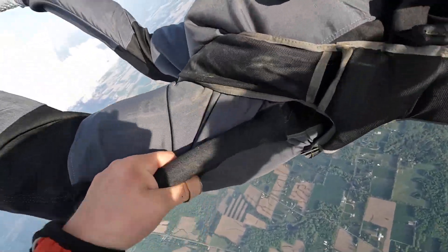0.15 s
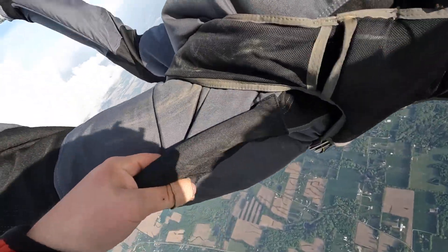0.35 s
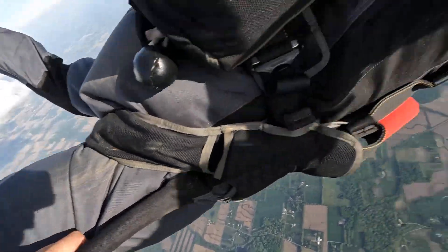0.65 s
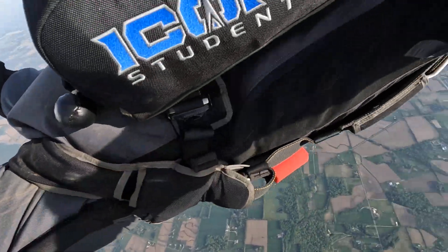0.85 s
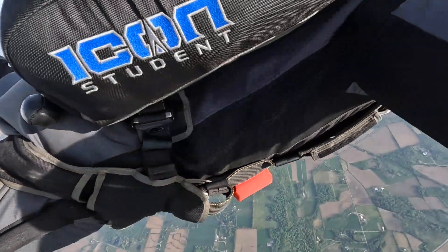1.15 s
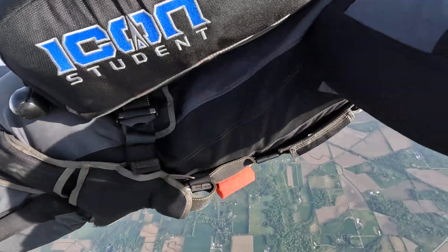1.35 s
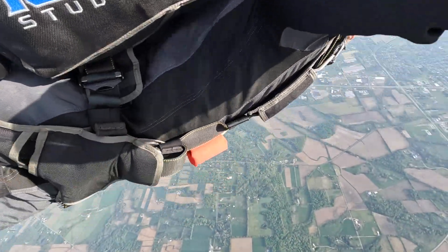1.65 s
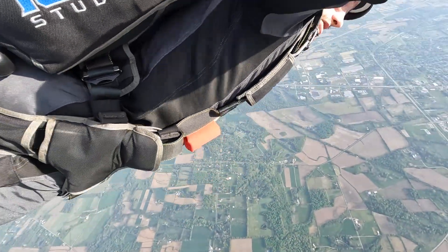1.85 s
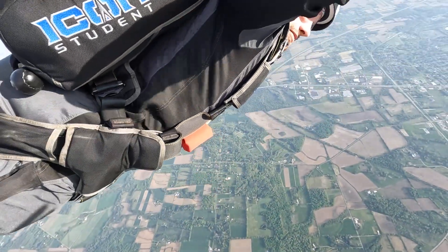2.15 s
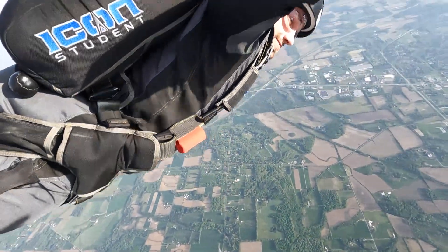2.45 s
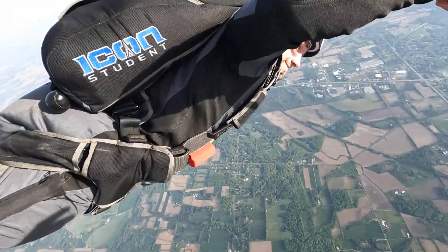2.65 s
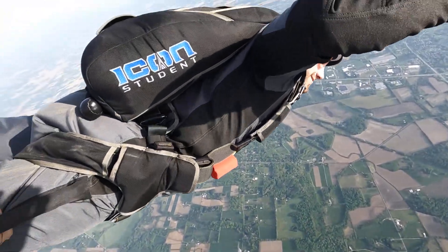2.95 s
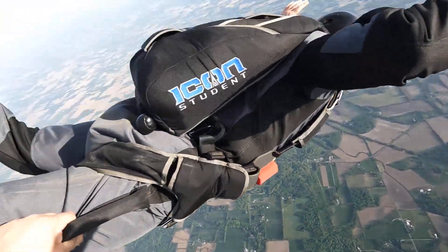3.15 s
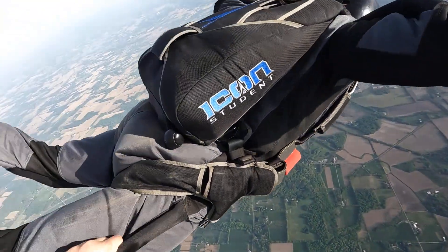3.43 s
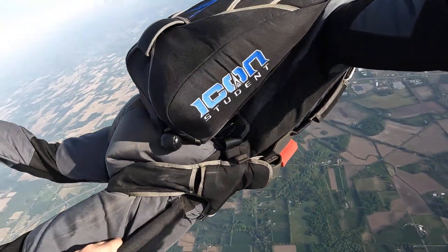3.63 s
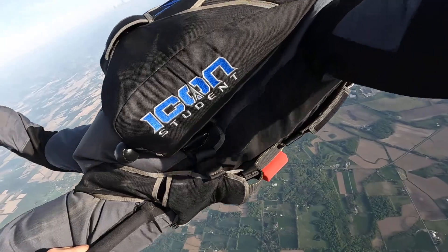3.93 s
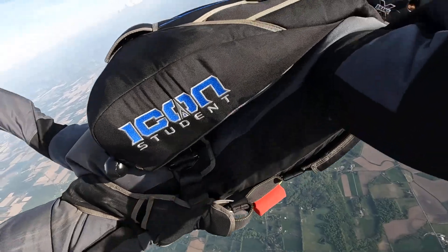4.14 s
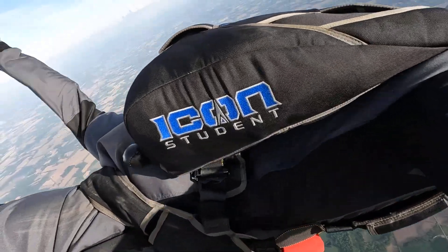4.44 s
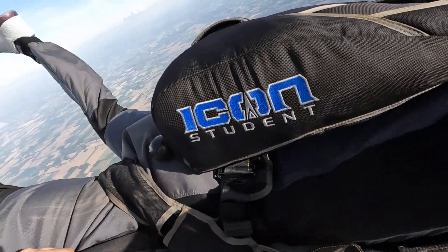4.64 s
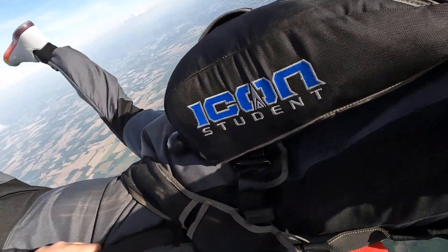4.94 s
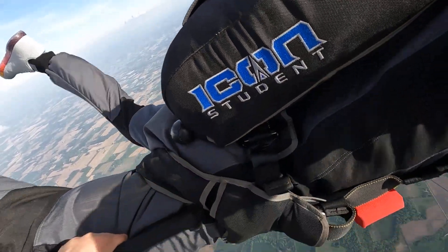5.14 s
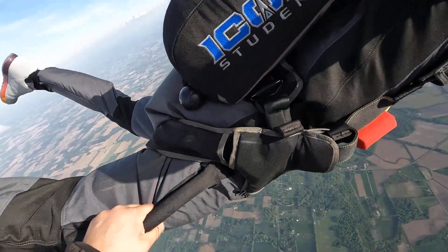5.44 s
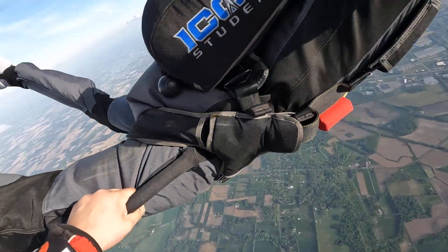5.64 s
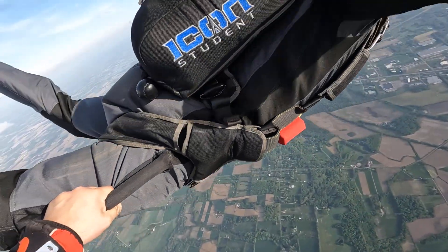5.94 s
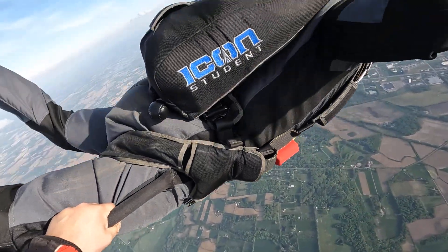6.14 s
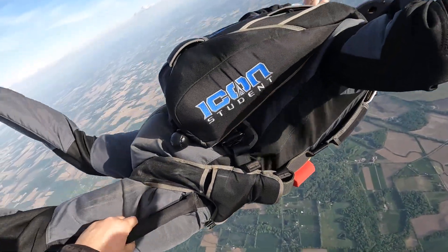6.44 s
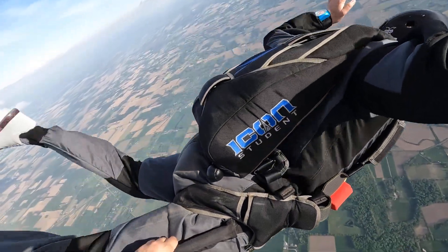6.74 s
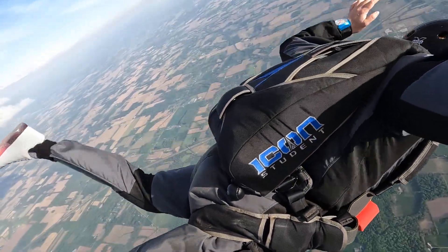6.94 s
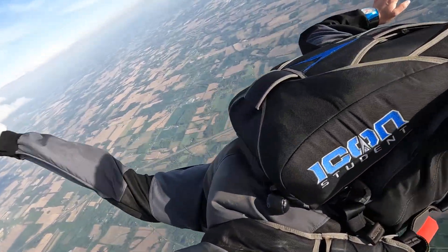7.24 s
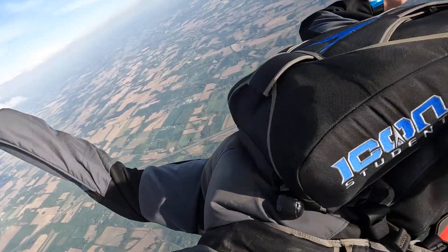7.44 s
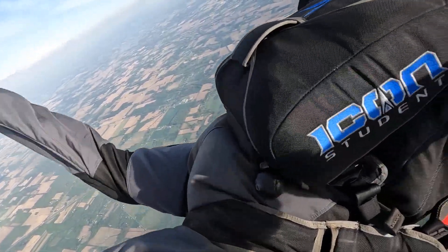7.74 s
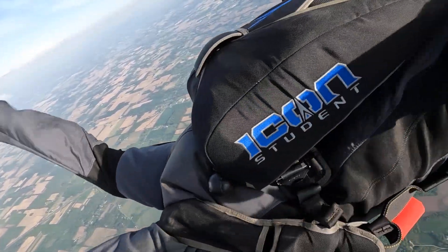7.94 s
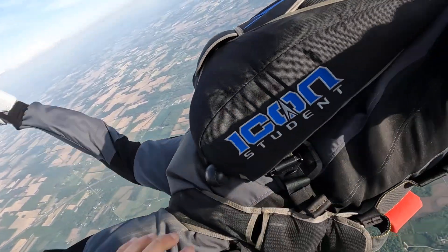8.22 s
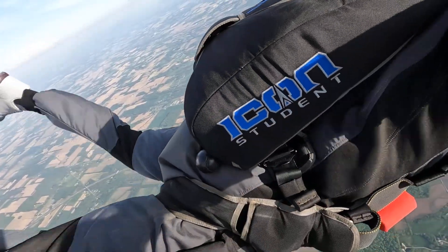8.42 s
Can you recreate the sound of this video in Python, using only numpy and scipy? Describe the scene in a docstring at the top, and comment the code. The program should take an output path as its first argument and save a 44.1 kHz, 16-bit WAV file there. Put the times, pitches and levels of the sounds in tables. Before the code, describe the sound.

A skydiver's rushing slipstream pounds a body-worn camera: deep uneven thumps, hollow whooshes, hissing turbulence, and a short rasp of flapping sleeve near the start.

```python
"""The slipstream of a freefall roars past a skydiver's camera, and its eddies buffet the microphone port.
Shaped noise makes the wind: humps that slide as the camera turns, deep heaves and hollow whooshes.
The rim of the port hisses and crackles, and hard slaps of air tear and thud. Early on a jumpsuit sleeve
flutters close by, made of rasp, edge cracks, rustle and beaten air. A limiter turns down around high peaks."""
import sys
import numpy as np
from scipy import signal
from scipy.fft import rfft, irfft, next_fast_len
from scipy.io import wavfile
from scipy.ndimage import uniform_filter1d, minimum_filter1d, map_coordinates

SR = 44100
rng = np.random.default_rng(int(sys.argv[2]) if len(sys.argv) > 2 else 0)


def log_audio(samples):
    """Write samples as a 16-bit WAV file to the path given in sys.argv[1]."""
    # one column per channel
    frames = np.atleast_2d(samples).T
    # limit to full scale, then quantise
    limited = np.clip(frames, -1, 1)
    pcm = np.round(limited * 32767).astype(np.int16)
    wavfile.write(sys.argv[1], SR, pcm)


N = 378378

# Shape of the smaller eddies' noise, also of the air the sleeve beats.
# Each row: octaves from the centre, relative level in dB per Hz.
EDDY_SHAPE = [(-3.5, -33), (-0.53, -5.5), (-0.22, 0), (.5, -5), (1.5, -11.5), (2.5, -20.5), (3.5, -33.5),
              (4.5, -51), (6, -93)]


def amp(db):
    """Decibels to gain."""
    return 10 ** (np.asarray(db) / 20)


def unit(x):
    """Scaled to rms 1."""
    return x / np.sqrt(np.mean(x ** 2) + 1e-20)


def curves(rows):
    """One value per sample for each column after the time."""
    s, *cols = np.transpose(rows)
    return [np.interp(np.arange(N) / SR, s, c) for c in cols]


def wobble(rate):
    """A smooth random curve, rate knots a second."""
    knots = rng.standard_normal(int(N * rate / SR) + 4)
    return map_coordinates(knots, [np.arange(N) * rate / SR])


def noise():
    """Fresh white noise."""
    return rng.standard_normal(N)


def filtered(x, response):
    """x times a response of frequency."""
    m = next_fast_len(N + SR // 2)
    return irfft(rfft(x, m) * response(np.fft.rfftfreq(m, 1 / SR)), m)[:N]


def coloured(x, spectrum):
    """x through (Hz, dB) points on a log axis, at rms 1."""
    f, db = np.transpose(spectrum)
    return unit(filtered(x, lambda hz: amp(np.interp(np.log(hz + 1), np.log(f), db))))


def steadied(x, span, share):
    """Evens out a share of the swells that last longer than span seconds, at rms 1."""
    window = signal.windows.hann(int(span * SR) + 3)
    power = np.abs(signal.fftconvolve(x ** 2, window / window.sum(), "same"))
    return unit(x / (power + 1e-4) ** (np.clip(share, 0, 1) / 2))


def bell(t, s, length):
    """A bell-shaped swell around s seconds; length is the width at half height."""
    return .5 ** ((2 * (t - s) / length) ** 2)


def swells(rows):
    """Bell-shaped swings in dB, one track for each level column."""
    t = np.arange(N) / SR
    tracks = np.zeros((3, N))
    for s, length, *depths in rows:
        near = slice(max(0, int((s - 2 * length) * SR)), int((s + 2 * length) * SR))
        tracks[:, near] += np.outer(depths, bell(t[near], s, length))
    return tracks


def shedding(rate):
    """An uneven sawtooth of rms 1: each vortex builds up, then breaks away at once."""
    turns = np.cumsum(rate * amp(5 * wobble(rate))) / SR
    size = rng.exponential(size=int(turns[-1]) + 1)[turns.astype(int)]
    ramp = uniform_filter1d(size * (turns % 1 - .5), size=60)  # softens the break
    return unit(ramp)


def wake(shape, centre_hz, hollow_db, patchy_db):
    """A hump of noise of rms 1, with a resonance on top, that slides with its centre and swells in patches."""
    hz, t, z = signal.stft(noise(), SR, nperseg=2048)

    def per_frame(curve):
        return np.interp(t, np.arange(N) / SR, curve * np.ones(N))

    octaves = np.log2((hz[:, None] + 1) / per_frame(centre_hz))
    resonance_db = per_frame(hollow_db) * np.exp(-(octaves / 0.62) ** 2)
    hump = amp(np.interp(octaves, *np.transpose(shape)) + resonance_db)
    # patches of the spectrum, 12 bins by 4 frames
    patches = uniform_filter1d(rng.standard_normal(z.shape), size=12, axis=0)
    patches = unit(uniform_filter1d(patches, size=4, axis=1))
    z = z * hump / np.linalg.norm(hump, axis=0) * amp(patchy_db * patches)
    return unit(signal.istft(z, SR, nperseg=2048)[1][:N])


def snaps():
    """The cloth's edge cracks like a small whip at an uneven rate; each crack starts at once and dies fast."""
    # Colour of the cracks. Each row: frequency in Hz, relative level in dB per Hz.
    crack_colour = [(800, -6), (2500, 6), (4800, 5), (6500, -5), (8500, -16), (10500, -27), (13000, -46),
                    (15000, -68)]
    rate, decay_s = 150, 0.0015  # median cracks a second, time constant
    turns = np.cumsum(rate * amp(4 * wobble(rate))) / SR
    cracks = np.diff(turns.astype(int), prepend=0) * amp(2.3 * noise())
    envelope = signal.lfilter([1], [1, -np.exp(-1 / (decay_s * SR))], cracks)
    return coloured(noise() * envelope, crack_colour)


def sleeve():
    """Taut cloth flaps, beats the air and tears in sharp bursts; a duller rustle bridges them."""
    # Bursts of flapping. Each row: start in seconds, length in seconds,
    # level in dB before the trim below, fall in dB per second.
    flutter_bursts = [(0.321, .003, -38, 1500), (0.338, 0.02, -31, 500), (.364, 0.022, -29.5, 600),
                      (0.399, 0.034, -31.5, 500), (0.438, .016, -32, 380), (0.518, 0.037, -32, 650),
                      (0.575, 0.036, -31.5, 950), (0.648, .018, -30, 1300), (0.682, .005, -36, 1400),
                      (.703, .005, -41, 1200)]
    # Sharp tearing of the cloth. Each row: frequency in Hz, relative level in dB per Hz.
    rasp_colour = [(400, -7), (1500, 1), (3000, 6.5), (4800, 0), (6500, -8.5), (8500, -21), (10500, -28),
                   (13000, -43), (15000, -69)]
    # Duller rustle under it. Each row: frequency in Hz, relative level in dB per Hz.
    rustle_colour = [(400, 5), (1500, 9), (2800, -1), (4000, -15), (6000, -34), (10000, -66)]
    rise_db_per_s, trim_db, linger_s = 2000, 4.0, 0.056
    snap_db, rustle_db, beat_db = -9.5, -3.5, -0.5  # over the burst envelope they follow

    t = np.arange(N) / SR
    levels = []
    for s, length, db, fall in flutter_bursts:
        before, after = np.maximum(s - t, 0), np.maximum(t - s - length, 0)
        levels.append(db - rise_db_per_s * before - fall * after)
    bursts = amp(np.max(levels, axis=0) + trim_db)
    lingering = uniform_filter1d(bursts, int(linger_s * SR))  # smeared over the gaps

    flaps = amp(2.2 * np.tanh(shedding(rate=140)) + 0.76 * wobble(900))
    rasp = unit(coloured(noise(), rasp_colour) * flaps)
    rustle = unit(coloured(noise(), rustle_colour) * flaps)
    beat = wake(EDDY_SHAPE, centre_hz=310, hollow_db=15, patchy_db=-1.0)
    sharp = rasp + amp(snap_db) * snaps()
    dull = amp(rustle_db) * rustle + amp(beat_db) * beat
    return bursts * sharp + lingering * dull


def whooshes(gust):
    """The stream blows across a gap in the gear: a band of air noise swells, fades and glides in pitch."""
    # Hollow whooshes. Each row: middle in seconds, length in seconds, pitch in Hz, level in dB.
    whoosh_rows = [(0.02, .08, 1170, -26), (1.263, 0.22, 1020, -27), (1.506, 0.18, 1200, -27),
                   (2.778, 0.12, 1190, -25), (3.503, 0.41, 1290, -27), (4.473, 0.069, 1840, -28),
                   (4.618, 0.14, 850, -27), (4.9, 0.1, 754, -28), (5.126, 0.097, 1050, -32),
                   (6.81, 0.17, 1880, -30.5), (7.128, 0.087, 1730, -26.5)]
    # Shape of a whoosh. Each row: octaves from its pitch, relative level in dB.
    gap_shape = [(-1.7, -39), (-0.62, -3.5), (-0.2, -0.5), (0.15, -6), (1.2, -23), (1.9, -67)]
    t = np.arange(N) / SR
    level = sum(amp(db) * bell(t, s, length) for s, length, hz, db in whoosh_rows)
    _, pitch_hz, _ = curves(whoosh_rows)
    return level * unit(wake(gap_shape, pitch_hz, hollow_db=2.5, patchy_db=1.0) * amp(0.71 * gust))


def heaves():
    """Each of the biggest eddies is a narrow rumble at its own pitch that swells and fades."""
    # Eddies rolling over the camera. Each row: middle in seconds, length in seconds,
    # pitch in Hz, level in dB.
    heave_rows = [(0.052, 0.15, 35.2, -17.5), (0.253, .1, 62, -19.5), (0.355, .17, 33, -21),
                  (.47, .14, 150, -21.5), (0.679, .2, 60, -18.5), (0.789, 0.17, 34, -19),
                  (0.873, 0.083, 62, -18.5), (1.012, .1, 62, -18.5), (1.441, .22, 33, -20),
                  (2.183, 0.36, 34, -21), (2.82, 0.19, 36, -24.5), (2.98, .08, 65, -20),
                  (3.283, 0.13, 75, -24), (3.396, .18, 33, -24), (3.551, .2, 67.6, -20),
                  (3.82, 0.18, 106, -23), (4.173, 0.11, 35, -22), (4.519, .25, 34, -19),
                  (4.732, 0.095, 65, -20), (5.196, .3, 32.3, -19), (5.62, 0.18, 134, -18.5),
                  (5.984, 0.099, 69.4, -19.5), (6.472, .14, 36, -19), (6.71, 0.25, 112, -20),
                  (7.11, 0.12, 36, -24), (7.46, .09, 125, -22), (8.002, 0.14, 120, -19.5),
                  (8.279, 0.17, 62, -19.5)]
    half_width = 0.34  # octaves
    t, out = np.arange(N) / SR, np.zeros(N)
    hz = np.fft.rfftfreq(2 * SR, 1 / SR)
    for s, length, pitch_hz, db in heave_rows:
        near = np.flatnonzero(np.abs(t - s) < min(2 * length, .5))
        band = np.exp(-(np.log2((hz + 1) / pitch_hz) / half_width) ** 2)
        rumble = unit(irfft(rfft(rng.standard_normal(2 * SR)) * band))
        rumble = steadied(rumble, span=3 / pitch_hz, share=1)
        out[near] += amp(db) * bell(t[near], s, length) * rumble[SR // 2:][:len(near)]
    return out


def hiss(hiss_db, pressure, gust, grit_db):
    """Fine turbulence at the port's rim, chopped by eddies; small vortices build up and break away."""
    # Colour of the hiss. Each row: frequency in Hz, relative level in dB per Hz.
    hiss_colour = [(500, 3), (1200, -2), (1900, 3), (2600, 0.5), (3200, 1), (4000, -9), (5200, -17.5),
                   (6500, -26), (8000, -41.5), (12000, -31), (13500, -64), (15000, -79)]
    carried_db = 0.67 * gust + 1.2 * pressure
    vortex_db = 0.65 * wobble(260) + 1.3 * np.tanh(shedding(rate=75))
    chop = amp(carried_db + vortex_db + grit_db)
    return amp(hiss_db + 4.0) * unit(coloured(noise(), hiss_colour) * chop)


def crackle(crackle_db, pressure, gust):
    """The flow tears at pressure crests: many tiny spits, thicker in gusts."""
    # Colour of the tiny spits. Each row: frequency in Hz, relative level in dB per Hz.
    spit_colour = [(200, 10), (800, 2.5), (2000, 8), (3500, 1.5), (5200, -6), (7500, -23), (10500, -27),
                   (12500, -43), (14500, -58)]
    crest = np.maximum(np.tanh(pressure + 0.31 * gust - .45), 0)
    tears = coloured(noise() * crest * amp(2.6 * wobble(350)), spit_colour)
    even = steadied(tears, span=.05, share=.8)
    return amp(crackle_db + 22.5 + 2.1 * wobble(22)) * even


def spits():
    """Single slaps of air: each tears in fast and snaps off over a dull push."""
    # Hardest slaps on the port. Each row: time in seconds, rip level and thud level in dB
    # before the trims below, decay time constant of the rip in seconds.
    slap_rows = [(.061, -38, -11.5, .002), (.092, -42, -15, .001), (.131, -39, -17, .0012),
                 (.177, -37, -21, .001), (.196, -31, -32, .0012), (.211, -37, -16, .002),
                 (.224, -30, -17, .0015), (.238, -35, -10.5, .001), (.270, -33, -15, .001),
                 (.276, -32, -11, .002), (.739, -31, -26, .0015), (.776, -29, -12, .002),
                 (.783, -32, -16, .0012), (.787, -34, -18, .0015), (.804, -38, -11, .0012),
                 (.820, -31, -12, .001), (.853, -40, -19, .0015), (.868, -36, -22, .0012),
                 (.883, -37, -15, .0015), (.925, -40, -15, .0015), (.945, -34, -26.5, .001),
                 (.951, -39, -21, .003), (.987, -30, -14, .0012), (1.008, -41, -13, .002),
                 (1.041, -29.5, -11, .0028), (1.1, -41, -14.5, .002), (1.115, -42, -22, .001),
                 (2.097, -32, -18, .001), (2.326, -38, -14.5, .001), (2.340, -35, -26, .0018),
                 (2.383, -34.5, -13.5, .004), (2.571, -37, -13, 0.0013), (2.68, -36, -14, .002),
                 (2.684, -35, -19, .0015), (2.921, -32, -17, .0015), (3.175, -31, -12, .0008),
                 (3.255, -35, -16, .002), (3.314, -29, -14, .0012), (3.320, -28, -18, .003),
                 (3.339, -39, -22, .0012), (3.539, -26, -19, 0.0018), (3.561, -37, -12.5, .001),
                 (3.674, -33, -22, .001), (3.683, -36, -13, .002), (3.8, -32, -18, .0015),
                 (3.953, -33, -24, .0015), (3.959, -38, -12, .0015), (4.325, -32, -15, .0015),
                 (4.774, -30, -14, 0.0024), (4.985, -34, -29, .0018), (4.998, -32, -19, .0012),
                 (5.358, -30, -13, .0015), (5.521, -32, -16, .0015), (5.535, -35, -22, .001),
                 (5.624, -34, -25, .0015), (5.641, -38, -16, .001), (5.694, -29, -10, .0015),
                 (5.712, -34, -18, .001), (5.802, -32, -13, .0015), (5.869, -45, -12, .002),
                 (5.929, -32, -25, .001), (6.467, -32, -15.5, .001), (6.489, -37, -13, .001),
                 (6.609, -30, -14.5, .0015), (6.695, -33, -14, .0015), (6.777, -29, -22, .001),
                 (6.908, -33, -25, .001), (7.028, -32, -14.5, .001), (7.328, -34, -24, .001),
                 (7.34, -31.5, -19.5, .001), (7.388, -38, -15, .001), (7.395, -28, -13.5, .0015),
                 (7.623, -27, -20, .0012), (7.791, -33, -19, .001), (7.836, -31, -17.5, .001),
                 (7.87, -32, -20, 0.00091), (7.915, -29, -21, .0015), (7.93, -30, -22, .001),
                 (7.989, -34, -19, .001), (8.018, -32, -19, .001), (8.031, -30, -29, .001),
                 (8.083, -28, -20, .001), (8.217, -32, -18, .001), (8.258, -30, -25, .001),
                 (8.278, -35, -18, .001), (8.314, -29, -27, .001), (8.325, -25.5, -17.5, 0.0018),
                 (8.483, -30, -14, .001)]
    # Sharp rip of a slap. Each row: frequency in Hz, relative level in dB per Hz.
    rip_colour = [(200, 8), (800, 7.5), (2000, 11), (3500, 3), (5200, -5.5), (7500, -21), (10500, -24),
                  (12500, -47), (14500, -63)]
    # Dull push of a slap. Each row: frequency in Hz, relative level in dB per Hz.
    thud_colour = [(80, -5.5), (200, 7.5), (400, -4), (900, -5.5), (2000, -21.5), (4000, -34), (8000, -64)]
    rip_rise_s, thud_rise_s, thud_decay_s = 0.00056, 0.0013, 0.0035  # time constants
    rip_trim_db, thud_trim_db = 6.0, 0.6
    t, tear, push = np.arange(N) / SR, np.zeros(N), np.zeros(N)
    for s, db, thud_db, decay in slap_rows:
        near = slice(int((s - .04) * SR), int((s + .06) * SR))
        age = t[near] - s
        tear[near] += amp(db) * np.exp(-np.maximum(-age / rip_rise_s, age / decay))
        push[near] += amp(thud_db) * np.exp(-np.maximum(-age / thud_rise_s, age / thud_decay_s))
    rip = steadied(coloured(noise(), rip_colour), span=.002, share=0.75)
    thud = steadied(coloured(noise(), thud_colour), span=0.0039, share=0.71)
    return amp(rip_trim_db) * tear * rip + amp(thud_trim_db) * push * thud


def buffeting(buffet_db, eddy_db, eddy_hz, gust):
    """Pressure on the port: an unbroken train of big eddies, and smaller ones that come in gusts."""
    # Colour of the big eddies. Each row: frequency in Hz, relative level in dB per Hz.
    buffet_colour = [(8, -2.5), (20, -2), (35, -5), (55, 1), (80, -2.5), (115, -4), (170, -15), (300, -25),
                     (700, -83)]
    big = steadied(coloured(noise(), buffet_colour), span=0.037, share=0.71)
    small = wake(EDDY_SHAPE, eddy_hz, hollow_db=1.0, patchy_db=0.5) * amp(1.47 * gust)
    small = steadied(small, span=0.22, share=0.5)
    big_gain = amp(buffet_db + 0.58 * wobble(16))
    small_gain = amp(eddy_db - 1.03 + 1.13 * wobble(14))
    return big_gain * big + small_gain * small


def slipstream(level_db, roar_hz, hollow_db, gust, grit_db):
    """The broad roar of air passing the bodies, shaken by the gusts."""
    # The roar's hump. Each row: octaves from its centre, relative level in dB.
    roar_shape = [(-2.5, -3.5), (-2, 3), (-0.25, 0.5), (.5, -4.5), (0.88, -11), (1.5, -24.5), (3, -70)]
    shake = amp(0.98 * gust + .6 * grit_db)
    roar = wake(roar_shape, roar_hz, hollow_db, patchy_db=0.83) * shake
    # the more hollow the roar, the quieter it is
    return amp(level_db - 0.2 - 0.57 * hollow_db) * steadied(roar, span=0.27, share=0.85)


def scene():
    """Shared swings, gusts and port pressure tie buffeting, roar, whooshes, hiss and crackle together;
    heaves, slaps and sleeve run on their own."""
    # Colour of the wakes as the camera turns. Each row: time in seconds, eddy centre in Hz,
    # roar centre in Hz, hollow resonance in dB.
    wake_colour = [(0, 196, 1175, 4), (.5, 248, 1260, 3.5), (.95, 236, 950, 10.5), (1.3, 221, 1130, 5),
                   (1.55, 240, 1180, 2), (1.95, 232, 640, -2.5), (2.3, 208, 925, 2), (2.8, 187, 964, 4.5),
                   (3.45, 130, 1220, 1), (3.85, 159, 1150, -0.5), (4.5, 230, 1370, 1), (4.8, 244, 1160, -2),
                   (5.2, 256, 1210, 0), (5.5, 190, 1156, -1.5), (5.85, 195, 1370, 6.5),
                   (6.7, 121, 1500, -3), (7.1, 168, 1640, -1), (7.7, 163, 1400, 0.5), (8.58, 180, 1510, 1)]
    # Slow pressure on the port as the camera moves through the wake.
    # Each row: time in seconds, base level of the big eddies in dB, of the smaller ones in dB.
    port_flow = [(0, -17.5, -23), (.5, -17.5, -18), (1.05, -17.5, -18.5), (1.2, -21, -21.5),
                 (1.95, -19, -22), (3.15, -20, -19.5), (3.3, -15.5, -20.5), (3.9, -19, -18),
                 (4.05, -18, -23), (4.5, -19.5, -23.5), (4.95, -17.5, -24), (5.1, -18, -25.5),
                 (5.42, -17.5, -21), (5.6, -16.5, -19.5), (6.45, -18, -18), (6.9, -17.5, -18.5),
                 (7.95, -17.5, -17.5), (8.58, -17, -19.5)]
    # Strength of the slipstream round the bodies. Each row: time in seconds, base level in dB.
    stream_strength = [(0.0, -21), (0.6, -23), (0.9, -31), (1.5, -25), (1.8, -23), (3.0, -20.5),
                       (3.15, -22), (3.45, -23.5), (4.05, -24), (4.95, -21.5), (6.45, -27.5), (8.25, -25.5),
                       (8.58, -25.5)]
    # Turbulence at the port's rim. Each row: time in seconds, base hiss in dB, base crackle in dB.
    rim_turbulence = [(0, -39.5, -78), (.75, -34.5, -69), (1.05, -42, -69), (1.2, -41.5, -88),
                      (2.5, -41, -72.5), (3.15, -38.5, -75), (3.55, -39.5, -63.5), (4.15, -36.5, -76),
                      (4.55, -42.5, -81), (5.4, -39.5, -77), (5.55, -37, -66.5), (6.3, -40.5, -70),
                      (6.6, -39, -64), (6.9, -39.5, -72), (7.45, -39.5, -67), (7.65, -39, -64),
                      (8.25, -42.5, -65.5), (8.58, -42, -72)]
    # Lulls, when the flow briefly lifts off the camera; single layers may rise.
    # Each row: middle in seconds, length in seconds, change of roar, eddies and buffets in dB.
    lulls = [(.08, 0.023, -4.5, 7, -0.5), (.252, 0.017, -4.5, -4.5, -2.5), (.3, 0.021, -7, 2, 4.5),
             (.755, 0.049, -12, -0.5, 0), (.83, 0.074, -12, -3.5, 2), (.902, 0.035, -10, -7, -9.5),
             (1.07, 0.02, -3, -2.5, -8), (1.15, 0.036, -4, -4, -9.5), (1.72, 0.065, 0, 1, -4),
             (1.8, 0.031, -4.5, -3.5, 3.5), (2.025, 0.043, -4.5, -4.5, 3.5), (2.13, 0.026, 2.5, -4.5, 0.5),
             (2.22, 0.032, 2.5, -9.5, -2.5), (2.42, 0.079, -3.5, -1, -1), (2.595, 0.028, -10, -5.5, -1),
             (2.7, 0.07, -1.5, -6, -1), (3.203, 0.037, -7.5, -3, -2), (3.275, 0.017, -5.5, -12, 0.5),
             (3.58, 0.024, -2.5, -10, -6.5), (3.75, 0.057, -0.5, -2, -10), (3.99, 0.067, -2.5, -4.5, 2),
             (4.23, 0.077, 1.5, -2, 0.5), (4.83, 0.047, 0.5, -5, -3.5), (5.03, 0.034, -5, 1, -12),
             (5.15, 0.084, 1, -5, -2.5), (5.42, 0.047, 0.5, -9.5, -10.5), (5.75, 0.034, -8, -2.5, -2.5),
             (5.85, .035, -4, -3, -3.5), (6.22, 0.034, 0.5, 0, 2), (6.345, 0.049, -5, -4, 2.5),
             (6.42, 0.078, 2.5, -9.5, 2), (6.75, 0.046, -3, -4, -2), (7.02, .05, -2, -4, 0.5),
             (7.25, .04, 1, -2.5, 1.5), (7.365, .03, -1, -1, 2), (7.43, 0.064, -3, -1, -3),
             (8.13, .033, 0, -4, -2), (8.51, 0.022, -6, -9.5, -4)]
    # Surges, when a large eddy strikes the camera; single layers may drop.
    # Each row: middle in seconds, length in seconds, change of roar, eddies and buffets in dB.
    surges = [(.12, 0.058, -0.5, 2.5, -0.5), (.215, .035, 1.5, 3, 0), (1.01, .06, -3, -0.5, 1),
              (1.11, 0.041, -2.5, 2.5, 2.5), (1.945, 0.035, 1.5, 5.5, 0), (2.08, 0.038, 3.5, -3, -4),
              (2.31, 0.078, 1, 2.5, 0), (2.54, 0.077, 3.5, -1, 1.5), (2.79, 0.018, -2.5, 8, 4),
              (2.96, 0.053, -1, 4, -1.5), (3.31, 0.031, 1.5, -5.5, -5.5), (3.81, 0.085, 0, 2, 4),
              (4.31, 0.07, -3, 7, 3.5), (4.75, 0.073, -2.5, 9, 2.5), (4.975, 0.045, -2, 7.5, 4.5),
              (5.34, .05, 0.5, 4.5, 5.5), (5.63, 0.049, -7, 4, -2.5), (6.29, 0.034, 1.5, 0.5, -0.5),
              (6.5, .07, 0, -2, 1.5), (7.65, 0.093, -0.5, 0, -1.5), (8.0, .09, -0.5, 4, 0)]
    # Fast flapping of the suits that roughens the wind. Each row: time in seconds, rms depth in dB.
    suit_grit = [(0, 1.2), (.8, 1.6), (1.3, .6), (3, 1.0), (5.4, 1.2), (6.5, 1.7), (7.7, 2.2), (8.58, 2.0)]

    eddy_hz, roar_hz, hollow_db = curves(wake_colour)
    buffet_db, eddy_db = curves(port_flow)
    stream_db, = curves(stream_strength)
    hiss_db, crackle_db = curves(rim_turbulence)
    grit_depth_db, = curves(suit_grit)
    swing_db, eddy_swing_db, buffet_swing_db = swells(lulls) + swells(surges)

    gust = unit(np.tanh(0.4 * (shedding(rate=26) + 0.5 * wobble(60) + .5 * wobble(140))))
    grit_db = grit_depth_db * unit(np.tanh(shedding(rate=150)))
    low = buffeting(buffet_db + buffet_swing_db, eddy_db + eddy_swing_db, eddy_hz, gust)
    pressure = unit(low)

    roar = slipstream(stream_db + swing_db, roar_hz, hollow_db, gust, grit_db) + whooshes(gust)
    rim = hiss(hiss_db + swing_db, pressure, gust, grit_db)
    # the crackle answers the eddies' swings 2.4 times as deeply in dB
    rim = rim + crackle(crackle_db + 2.4 * eddy_swing_db, pressure, gust)
    return (low + heaves() + roar + rim + spits() + sleeve())[None]


def limited(x, ceiling_db, hold):
    """Turns the gain down around each peak that would pass the ceiling; hold is in seconds."""
    size = int(hold * SR) + 1
    needed = np.minimum(1, amp(ceiling_db) / (np.abs(x) + 1e-9))
    return x * uniform_filter1d(minimum_filter1d(needed, size), size)


def record(dry):
    """The camera's limiter and band limit."""
    top_hz = 14800
    held = limited(dry[0], ceiling_db=-4.0, hold=0.037)
    return filtered(held, lambda hz: hz < top_hz)[None]


dry = scene()
out = record(dry)
log_audio(out)
```